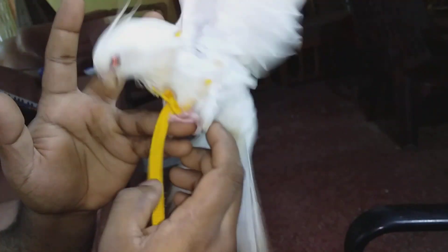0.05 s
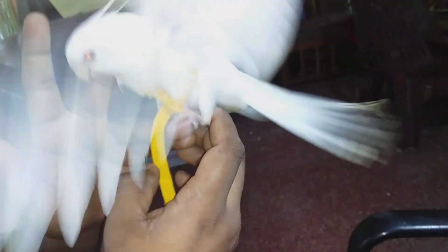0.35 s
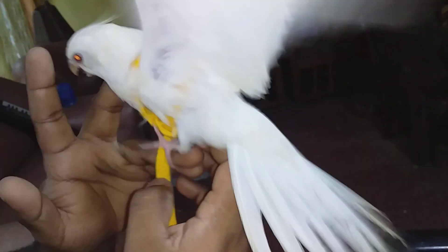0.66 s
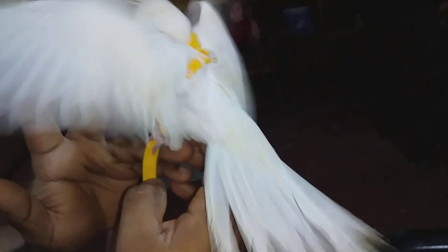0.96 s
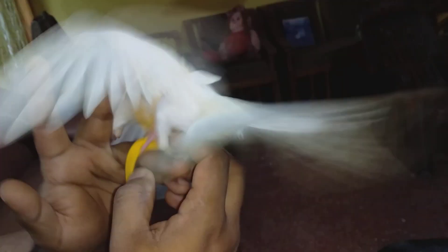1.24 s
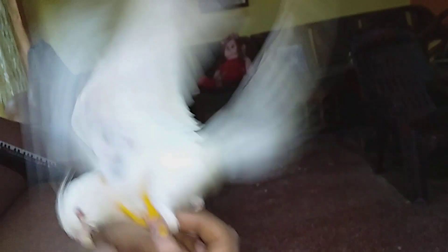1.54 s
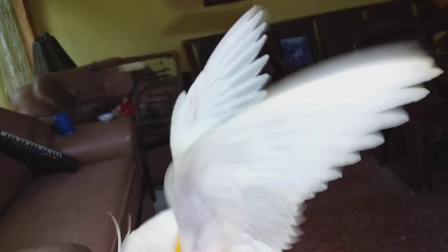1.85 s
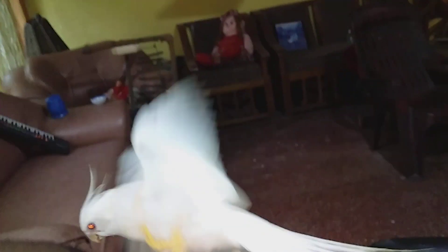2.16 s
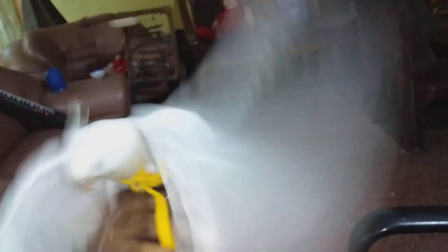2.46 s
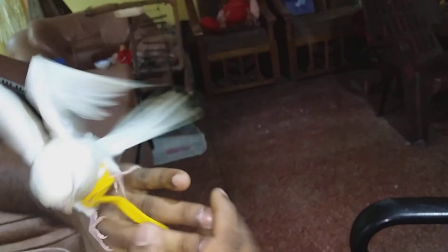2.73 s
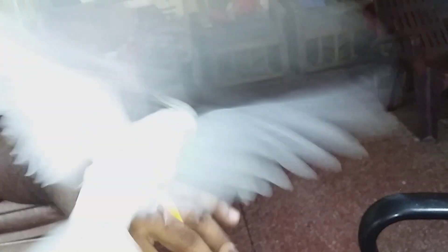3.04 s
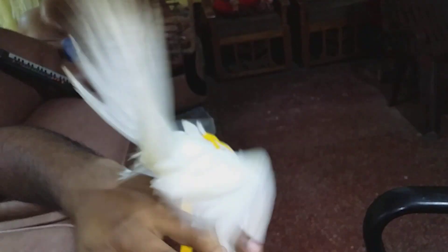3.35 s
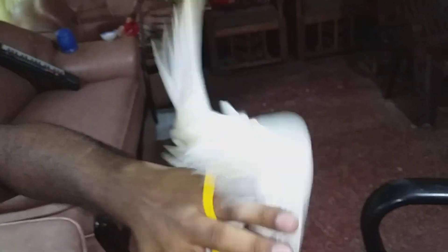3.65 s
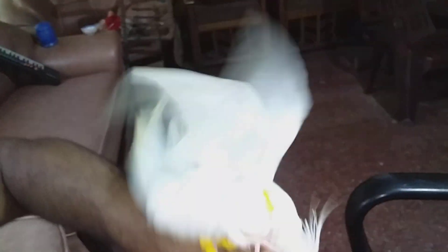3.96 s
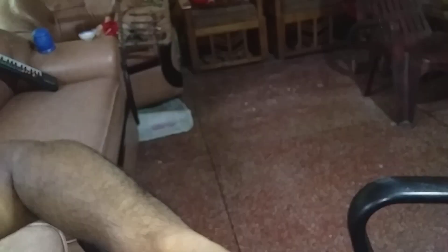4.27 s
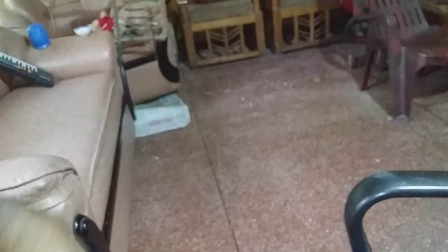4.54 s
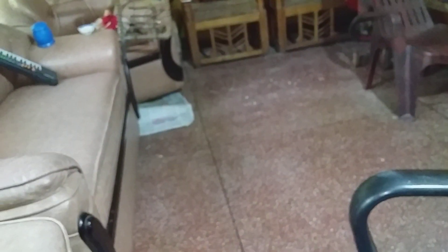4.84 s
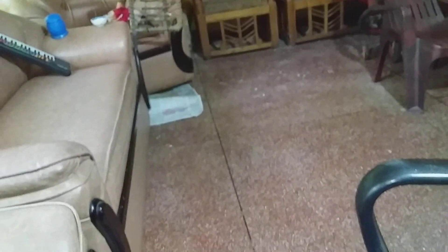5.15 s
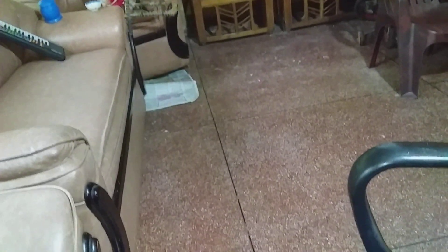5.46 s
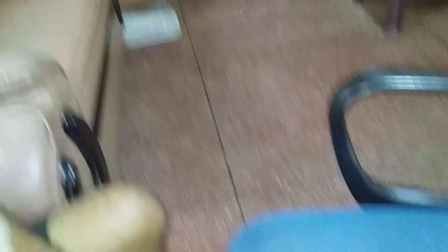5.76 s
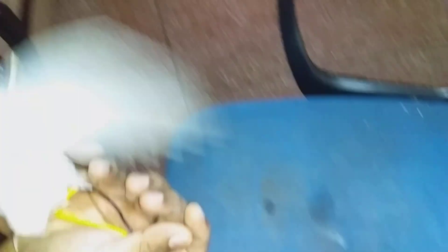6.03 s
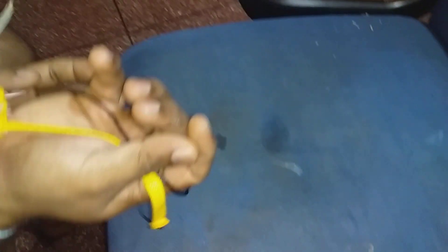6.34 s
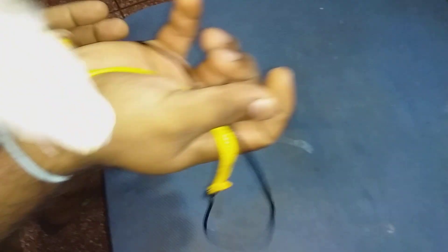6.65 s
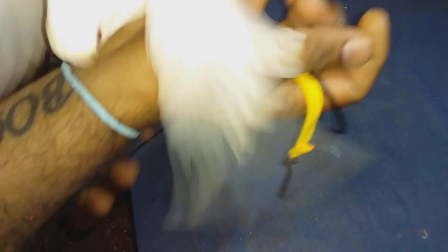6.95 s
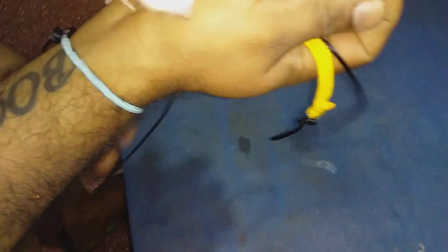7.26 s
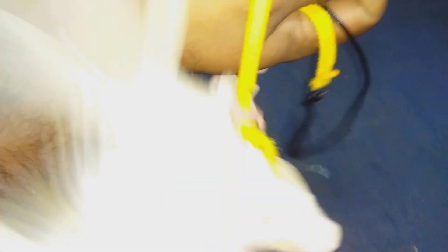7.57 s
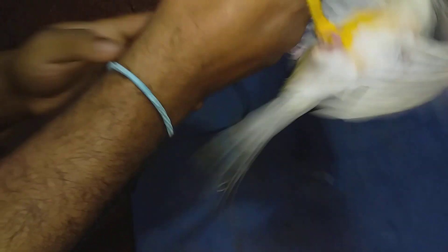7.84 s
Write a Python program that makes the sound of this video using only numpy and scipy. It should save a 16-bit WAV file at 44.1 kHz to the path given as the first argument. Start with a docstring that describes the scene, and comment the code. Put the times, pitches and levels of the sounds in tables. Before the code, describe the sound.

In a small living room, a cockatiel held on a leash struggles and gives five short, high, hoarse calls that rise and fall. Between them its feathers rustle, its wings puff air at the close microphone, and its claws and leash clasp tick. Near the end comes a sharp snap, then a wing slaps the microphone with a low thump. A fan hums and hisses softly throughout.

```python
"""Cockatiel flapping on a hand

In a small living room a leashed cockatiel struggles and gives five short, arched, hoarse calls, its
throat lifting each harmonic that sweeps through. Feathers rub, wings push puffs of air, claws and leash
tick. Near the end something snaps close by and a wing slaps the phone with a low thump. Behind it all
a fan's motor hums and its air hisses."""
import sys
import numpy as np
from scipy import signal
from scipy.fft import rfft, irfft
from scipy.io import wavfile
from scipy.ndimage import uniform_filter1d, minimum_filter1d

SR = 44100
rng = np.random.default_rng(int(sys.argv[2]) if len(sys.argv) > 2 else 0)


def to_wav(sig):
    """Store sig (one row per channel, or 1-D mono) as 16-bit WAV at the path in sys.argv[1].

    Samples outside -1..1 are clipped; the rate is SR.
    """
    pcm = np.clip(np.atleast_2d(sig), -1, 1) * 32767
    pcm = np.round(pcm).astype(np.int16)
    wavfile.write(sys.argv[1], SR, pcm.T)  # frames by channels


N = 352800
T = np.arange(N) / SR

# fader ride for the whole fan (t/s, level/dB)
FAN_RIDE = [(0, -43.5), (3.5, -45), (7.25, -44.5), (8, -49.5)]
# the fan's rushing air and the hiss on top of it (f/Hz, relative level/dB)
FAN_AIR_EQ = [(18, -61), (30, 2), (80, -9.5), (109, 3.5), (141, -4), (233, -9), (283, -3), (438, -1.5),
              (468, -0.5), (582, -3.5), (678, -2.5), (3050, -5.5), (4720, -8.5), (5500, -19.5), (7150, -37),
              (12100, -120)]
FAN_HISS_EQ = [(3500, -32.5), (5000, 1.5), (6200, -0.5), (9000, -4), (12000, -6), (16000, -16.5)]
# the fan's motor lines (f/Hz, relative level/dB)
MOTOR_LINES = [(118.4, -69.5), (156.1, -63.5), (193.8, -60), (231.5, -63), (312.2, -61.5), (463.0, -56.5)]
# low hum, swelling as the phone comes down to the chair (t/s, level/dB)
LOW_HUM_RIDE = [(0, -69), (5.7, -61), (6.1, -54.5), (6.9, -49), (7.45, -52.5), (8, -58.5)]
# bouts of struggling (middle t/s, width/s, rustle level/dB, stirred air level/dB)
BOUTS = [(.08, 0.14, -51.5, -62), (.9, 0.42, -49.5, -51), (3.02, 0.15, -46, -48), (3.8, 0.27, -56.5, -62),
         (4.52, 0.21, -46.5, -64), (5.5, 0.38, -56.5, -72), (7.15, 0.12, -51, -45)]
# tone of rubbing feathers (f/Hz, relative level/dB)
FEATHER_EQ = [(400, -1.5), (1500, -12), (4200, 4), (5600, 0), (9000, -0.5), (12000, -0.5), (16000, -15)]
# the strongest sweeps of feather over feather (middle t/s, relative level/dB, width/s)
SWISHES = [(0.263, -33, 0.0075), (.73, -46.5, 0.0058), (2.335, -45, 0.022), (2.56, -44.5, 0.0095),
           (3.412, -41, 0.016), (3.71, -40.5, 0.023), (4.275, -37.5, 0.011), (4.325, -43, 0.011),
           (4.382, -27, 0.0035), (4.625, -39, 0.0052), (4.735, -36, 0.011), (6.18, -47, 0.013),
           (6.82, -39, 0.0058), (7.015, -43, 0.015), (7.16, -38.5, 0.027), (7.253, -34.5, .006),
           (7.34, -41, 0.031), (7.64, -40.5, 0.027)]
# the strongest puffs from the wings (middle t/s, level/dB, width/s, cutoff f/Hz)
PUFFS = [(.62, -34, 0.017, 186), (1.85, -46, 0.042, 100), (3.094, -30.5, 0.0051, 420),
         (4.419, -31.5, 0.0091, 600), (4.455, -42, 0.022, 170), (6.88, -44, 0.064, 140),
         (7.088, -35, 0.0092, 220), (7.172, -38, 0.023, 280), (7.36, -38, .025, 139)]
# knocks of claws and leash clasp (t/s, level/dB, relative brightness/dB)
TICKS = [(0.2537, -28, -5), (1.662, -14, -30), (3.1914, -26, -7), (3.384, -19, -19), (3.9627, -19.5, -8),
         (4.3566, -19, -3), (4.366, -23, -15), (4.3798, -13, -11), (4.426, -15.5, -20), (4.7228, -22, 1),
         (5.0977, -25, -3), (6.603, -28.5, 12), (6.8059, -16, -10), (6.998, -21, -8), (7.0876, -23, -16),
         (7.3684, -22.5, -18), (7.4074, -29, -1)]
# tone of those knocks (f/Hz, relative level/dB)
TICK_EQ = [(300, -5), (1200, -12), (2500, -5.5), (4000, 1), (5500, -8), (9000, -18), (13000, -8),
           (16000, -22)]
# the calls (t/s, rise/s, fall/s, first f/Hz, top f/Hz, last f/Hz, relative level/dB, attack/s, sag/dB,
# hoarseness at the top/0-1, warble depth/share of pitch, fundamental at the foot/dB, at the top/dB,
# upper harmonics/dB, sizzle/dB, throat tuning/ratio, room against direct sound/dB)
CALLS = [(.415, 0.12, 0.07, 1453, 2106, 1966, -16.5, .052, -3, 0.47, 0.032, -4.5, 6.5, -6.5, -22, 0.83, 8.5),
         (.813, 0.11, 0.11, 1430, 2265, 1793, -9.5, 0.044, 2, 0.13, 0.074, -1.5, 3, -12.5, -40, 1.032, -2),
         (2.688, 0.085, .058, 1685, 2352, 1780, -18, 0.041, -3, 0.51, 0.037, 0, 6.5, -10, -24.5, 0.946, 0),
         (3.596, .07, .024, 1759, 2467, 2370, -29, 0.017, -5, 0.75, 0.037, 10, 4.5, -14, -42, 1.05, 6),
         (5.648, 0.092, .045, 1610, 2219, 2100, -13, 0.046, -15.5, .3, 0.042, -6, -5.5, -9, -46, 1.006, 4.5)]
# resonances of throat and beak, then the beak's high sizzle (f/Hz, relative level/dB)
THROAT_EQ = [(600, -49), (1300, -16), (2150, -4), (3000, -10.5), (3650, 7), (4700, -2), (5500, -10.5),
             (6700, -15.5), (9000, -30), (12000, -20), (16000, -61)]
SIZZLE_EQ = [(5000, -62), (9500, -15), (11300, 0.5), (12400, 2.5), (13600, -5), (16000, -11)]
# a close snap and its rebounds (t/s, level/dB, brightness/dB, ring time/s)
SNAP_HITS = [(7.1300, -0.5, -3, 0.0038), (7.1313, -7, -1, 0.014), (7.1337, -20, 2, 0.0071),
             (7.1388, -18, -4, 0.014)]
# tone of the snap (f/Hz, relative level/dB)
SNAP_EQ = [(100, -6), (600, -2.5), (1500, 2), (2700, 2.5), (3900, 7.5), (5000, -12), (9000, -3),
           (12000, -6), (16000, -14)]
# quills slapping the phone (t/s, level/dB, brightness/dB, ring time/s)
SLAP_HITS = [(7.4885, -10, -6, 0.023), (7.4918, 0, -12, 0.0074), (7.4975, -18, 6, 0.077),
             (7.5028, -6, 3, 0.039)]
# tone of the slaps (f/Hz, relative level/dB)
SLAP_EQ = [(100, 16), (400, 5.5), (900, 4), (2000, -3.5), (3200, -1), (4400, 2.5), (5800, -9),
           (11000, -10.5), (16000, -19)]
# air the wing squeezes into the microphone port (t/s, level/dB, first f/Hz, last f/Hz, ring time/s)
THUMPS = [(7.4923, -7.5, 390, 191, 0.048), (7.5046, -1.5, 288, 59.4, 0.058)]
# the port swallows a band of treble (f/Hz, level/dB)
PORT_EQ = [(25, -17.5), (60, -3), (5200, -0.5), (6100, -9), (7000, -22), (8000, -23.5), (8900, -20),
           (9900, -4), (11500, 3.5), (16000, -3.5)]

TOP_HZ = 16200  # upper edge of the mix
ONSET_DB, RELEASE_DB, RELEASE_S = -14, -9, 0.021  # how a call opens and closes
FOOT_HOARSE = 0.87  # the voice is roughest at the foot of its arch


def undb(db):
    """Decibels to gain."""
    return 10 ** (np.asarray(db) / 20)


def unit(x):
    """Scale to rms 1."""
    return x / np.sqrt(np.mean(x ** 2) + 1e-20)


def gain_at(eq, hz):
    """Gain of an EQ curve (f/Hz, level/dB) at any frequency."""
    f, db = np.transpose(eq)
    return undb(np.interp(np.log(np.maximum(hz, 1)), np.log(f), db))


def ride(points):
    """Fader curve in dB through (t/s, level/dB) points."""
    return np.interp(T, *np.transpose(points))


def colour(x, eq, size=4096):
    """Minimum-phase EQ: nothing rings ahead of an attack."""
    cepstrum = irfft(np.log(gain_at(eq, np.arange(size // 2 + 1) * SR / size)))
    cepstrum[1:size // 2] *= 2
    cepstrum[size // 2 + 1:] = 0
    return signal.oaconvolve(x, irfft(np.exp(rfft(cepstrum))))[:len(x)]


def cut(x, hz, kind, order=2):
    """Low-pass or high-pass."""
    return signal.sosfilt(signal.butter(order, min(hz, .45 * SR), kind, fs=SR, output="sos"), x)


def noise():
    """White noise."""
    return rng.standard_normal(N)


def walk(rate):
    """Random wander with about rate turns a second and spread near 1."""
    turns = noise()[:int(T[-1] * rate) + 2]
    return np.interp(T * rate, np.arange(len(turns)), turns)


def phase_of(hz):
    """Running phase of a moving frequency."""
    return 2 * np.pi * np.cumsum(hz) / SR


def swell(db, width):
    """A bell-shaped rise and fall, centred in a stretch of 0.3 s."""
    t = T[:SR * 3 // 10]
    return undb(db) * np.exp(-.5 * ((t - t.mean()) / width) ** 2)


def add(out, s, x, centred=False):
    """Mix a short sound in, starting or centred at a time."""
    i = int(s * SR) - centred * (len(x) // 2)
    out[max(i, 0):i + len(x)] += x[max(-i, 0):N - i]


def fan(air_db=5.5, hiss_db=-8, hum_db=46, waver_db=0.5, drift_hz=0.72, flicker_db=0.83):
    """The bed: rushing air, hiss and wavering motor lines on one fader."""
    air = unit(cut(colour(noise(), FAN_AIR_EQ), 59, "high")) * undb(air_db + flicker_db * walk(12))
    hiss = unit(colour(noise(), FAN_HISS_EQ)) * undb(hiss_db)
    hum = 0
    for hz, db in MOTOR_LINES:
        amplitude = np.sqrt(2) * undb(db + hum_db + waver_db * walk(3.5))
        hum += amplitude * np.sin(phase_of(hz + drift_hz * walk(6)))
    return (air + hiss + hum) * undb(ride(FAN_RIDE))


def low_hum(hz=117.0, lower_db=-4, waver_db=2.0):
    """Two motor lines an octave apart, louder near the floor."""
    phase = phase_of(hz + 0.53 * walk(6.6))
    lines = undb(lower_db) * np.sin(phase) + np.sin(2 * phase)
    return np.sqrt(2) * lines * undb(ride(LOW_HUM_RIDE) + waver_db * walk(4.1))


def struggle(rest_db=-58.5):
    """Envelopes of rustle and stirred air: bouts swell and die away over a faint resting rustle."""
    rustle, air = undb(rest_db), 0
    for s, width, rustle_db, air_db in BOUTS:
        bell = np.exp(-.5 * ((T - s) / width) ** 2)
        rustle = rustle + undb(rustle_db) * bell
        air = air + undb(air_db) * bell
    return rustle, air


def wing_beats(beat_hz=10.0, unevenness=0.244, depth_db=4.5):
    """Tremolo from the uneven beat of the wings."""
    phase = phase_of(beat_hz * (1 + unevenness * walk(7.2)))
    return undb(depth_db * np.cos(phase))


def feathers(rustle, grain_db=4, ruffle_db=-2, swish_db=-1):
    """Barbs slip over barbs in tiny grains and short flicks: an uneven ruffle with stronger sweeps."""
    flicks_db = 3.5 * walk(260)
    barbs = unit(colour(noise() * undb(grain_db * walk(1500) + flicks_db), FEATHER_EQ))
    rubbing = rustle * undb(ruffle_db + 2.5 * walk(45))
    for s, db, width in SWISHES:
        add(rubbing, s, swell(db + swish_db, width), centred=True)
    return barbs * rubbing


def puffs(stirred, stirred_db=-2, cutoff_hz=135):
    """Down-strokes blow low turbulence over the microphone."""
    rumble = unit(cut(cut(noise(), 45, "high"), cutoff_hz, "low", order=3))
    out = rumble * stirred * undb(stirred_db)
    for s, db, width, hz in PUFFS:
        shape = swell(db, width)
        air = cut(cut(rng.standard_normal(len(shape)), 55, "high"), hz, "low", order=3)
        add(out, s, unit(air) * shape, centred=True)
    return out


def cracks(hits, eq, grit=0.76):
    """Hard contacts: each a gritty, fast-dying burst with a bright edge layered over its body."""
    out, t = np.zeros(N), T[:SR // 8]
    for s, db, bright_db, t60 in hits:
        hiss, grains = rng.standard_normal((2, len(t)))
        burst = colour(hiss * np.exp(grit * grains) * undb(-60 * t / t60), eq)
        body = cut(burst, 10200, "low", order=4)
        edge = cut(burst, 7100, "high", order=4)
        add(out, s, undb(db) * (body + undb(bright_db) * edge) / np.abs(body).max())
    return out


def ticks(rustle, ring_s=0.017, bright_db=4, faint_db=12, scatter_db=3, faint_bright_db=-4, count=36):
    """Claws and leash clasp knock; faint extra ticks fall at random, louder as the rustle grows."""
    hits = [(s, db, treble_db + bright_db, ring_s) for s, db, treble_db in TICKS]
    for i in rng.integers(0, N, count):
        db = 20 * np.log10(rustle[i]) + faint_db + scatter_db * rng.standard_normal()
        hits.append((T[i], db, faint_bright_db, ring_s))
    return cracks(hits, TICK_EQ)


def arch(t, rise_s, fall_s, first_hz, top_hz, last_hz, rise_power=1.6, drop_power=1.5):
    """Pitch t seconds into a call: it climbs in an S, then drops ever faster."""
    climb = np.sin(np.pi / 2 * np.clip(t / rise_s, 0, 1)) ** rise_power
    drop = np.clip((t - rise_s) / fall_s, 0, 1) ** drop_power
    return first_hz + (top_hz - first_hz) * climb - (top_hz - last_hz) * drop


def call(start, rise_s, fall_s, first_hz, top_hz, last_hz, level_db, attack_s, sag_db, top_hoarse,
         warble_depth, foot_fundamental_db, top_fundamental_db, upper_db, sizzle_db, throat_ratio,
         warble_hz=54, flutter_db=4.0, harsh_db=9, fifth_db=-12, hiss_db=1.5, edge_s=.005, count=10):
    """The syrinx sweeps an arch, warbling on the way up; the throat lifts harmonics passing through."""
    end = start + rise_s + fall_s
    on = (T > start) & (T < end + edge_s)
    t = T[on]
    pitch = arch(t - start, rise_s, fall_s, first_hz, top_hz, last_hz)
    foot = np.clip((top_hz - pitch) / (top_hz - first_hz), 0, 1)  # 1 at the arch's foot, 0 at its top
    hoarse = top_hoarse + (FOOT_HOARSE - top_hoarse) * foot
    db = level_db + np.interp(t, [start, start + attack_s, end - RELEASE_S, end],
                              [ONSET_DB, 0, sag_db, sag_db + RELEASE_DB])
    # a hoarse syrinx loses its steady beat: pitch and strength shake
    shake, flutter, air = rng.standard_normal((3, len(t)))
    jitter = (.005 + .036 * hoarse) * unit(cut(shake, 262, "low"))
    flutter = unit(cut(flutter, 180, "low"))
    warble = warble_depth * np.sqrt(np.sin(np.pi * np.clip((t - start) / rise_s, 0, 1)))
    pitch = pitch * (1 + warble * np.sin(2 * np.pi * warble_hz * (t - start)) + jitter)
    phase = phase_of(pitch)
    k = np.arange(1, count + 1)[:, None]
    harmonics = np.sin(k * phase) * (k * pitch < TOP_HZ)
    # forcing the voice strengthens the upper harmonics; from the fifth on they fade
    fundamental_db = top_fundamental_db + (foot_fundamental_db - top_fundamental_db) * foot
    balance_db = fundamental_db * (k == 1) + (upper_db + harsh_db * hoarse) * (k > 2) + fifth_db * (k > 4)
    throat = [(hz * throat_ratio, peak_db) for hz, peak_db in THROAT_EQ]
    gains = gain_at(throat, k * pitch) * undb(balance_db)
    tone = (gains * harmonics).sum(0) / np.sqrt((gains ** 2).sum(0) / 2)
    # air escapes once a cycle and rasps in the same throat
    breath = air * (1 + np.cos(phase))
    rasp = .36 * hoarse * unit(colour(breath, throat))
    # the highest harmonics beam out of the open beak at the height of the call
    beam = unit((gain_at(SIZZLE_EQ, k * pitch) * harmonics).sum(0))
    beam += undb(hiss_db) * unit(colour(breath, SIZZLE_EQ))
    sizzle = undb(sizzle_db + db - db.max()) * unit((1 - foot) * beam)
    fade = np.clip(np.minimum(t - start, end + edge_s - t) / edge_s, 0, 1)
    out = np.zeros(N)
    out[on] = (tone + rasp + sizzle) * fade * undb(db + flutter_db * hoarse * flutter)
    return out


def voice(level_db=-1):
    """Five calls, each sharing its energy between the direct path and the room."""
    direct, send = 0, 0
    for *gesture, room_db in CALLS:
        near = call(*gesture) / np.hypot(1, undb(room_db))
        direct += near
        send += near * undb(room_db)
    return undb(level_db) * (direct + room(send))


def thumps(settle_s=0.0041):
    """A wing presses air into the port: big low swings that slow as they die."""
    out, t = np.zeros(N), T[:SR // 5]
    for s, db, first_hz, last_hz, t60 in THUMPS:
        hz = last_hz + (first_hz - last_hz) * np.exp(-t / settle_s)
        add(out, s, -np.sin(phase_of(hz)) * undb(db - 60 * t / t60))
    return out


def room(x, t60=0.46, treble_t60=0.29, predelay_s=0.00235, early_db=6.0, early_s=0.018):
    """Living-room reverb: strong early echoes from floor and furniture, then a diffuse tail."""
    t = T[:SR * 3 // 4]
    hiss, sparse = rng.standard_normal((2, len(t)))
    tail = cut(hiss, 7200, "low") * undb(-60 * t / t60)
    tail += cut(hiss, 8200, "high") * undb(-60 * t / treble_t60)
    taps = unit(sparse ** 5)  # a few spikes stand out as single echoes
    early = taps * undb(early_db) * np.exp(-t / early_s)
    response = (tail + early) * (t > predelay_s)
    return signal.oaconvolve(x, response / np.linalg.norm(response))[:N]


def gain_control(x, threshold_db=-18, depth_db=4.0, hold_s=1.095, slew_s=0.32):
    """A loud sound ducks the gain; it stays down for a while, then glides back."""
    power = uniform_filter1d(cut(x, 3000, "low") ** 2, SR // 40)
    over_db = 10 * np.log10(np.abs(power) + 1e-12) - threshold_db
    wanted_db = -np.clip(2 * over_db, 0, depth_db)
    hold, slew = int(hold_s * SR), int(slew_s * SR)
    held_db = minimum_filter1d(wanted_db, hold, origin=(hold - 1) // 2, mode="constant")
    return x * undb(uniform_filter1d(held_db, slew, origin=(slew - 1) // 2, mode="constant"))


def scene(handling_room_db=-6, snap_room_db=-14, slap_room_db=-21):
    """Mono mix of bird, close hits and fan; the nearer a sound, the less room it carries."""
    rustle, air = struggle()
    beats = wing_beats()
    handling = ticks(rustle) + feathers(rustle * beats)
    snap = cracks(SNAP_HITS, SNAP_EQ)
    slaps = cracks(SLAP_HITS, SLAP_EQ)
    send = undb(handling_room_db) * handling + undb(snap_room_db) * snap + undb(slap_room_db) * slaps
    foley = handling + snap + slaps + room(send)
    return (voice() + foley + thumps() + puffs(air * beats) + fan() + low_hum())[None]


def record(dry, ceiling=0.78, low_cut_hz=29, window=129):
    """The port colours the mix, loud moments duck it, a fast limiter holds the peaks, the top is cut."""
    x = gain_control(cut(colour(dry[0], PORT_EQ), low_cut_hz, "high"))
    wanted_gain = ceiling / np.maximum(np.abs(x), ceiling)
    limited = x * uniform_filter1d(minimum_filter1d(wanted_gain, window), window)
    top_cut = signal.ellip(10, .2, 80, TOP_HZ, fs=SR, output="sos")
    return signal.sosfilt(top_cut, limited)[None]


dry = scene()
out = record(dry)
to_wav(out)
```